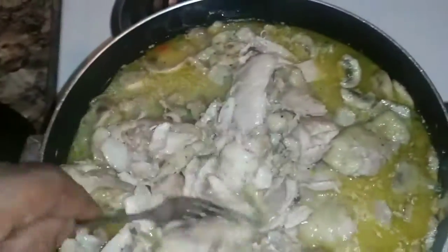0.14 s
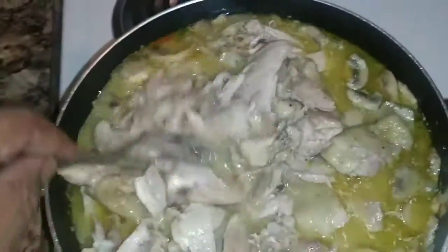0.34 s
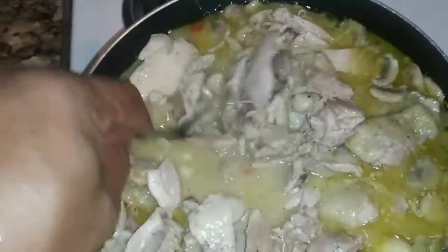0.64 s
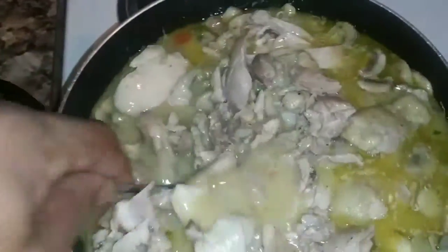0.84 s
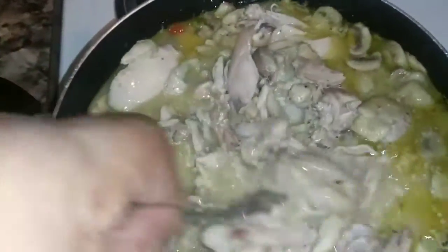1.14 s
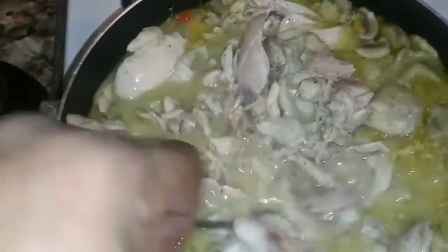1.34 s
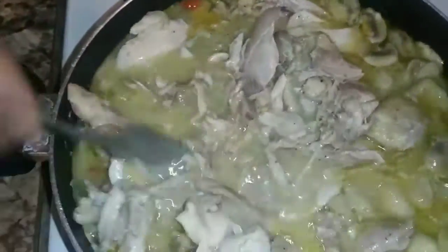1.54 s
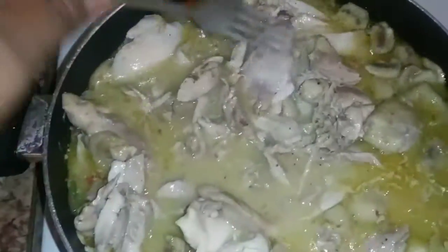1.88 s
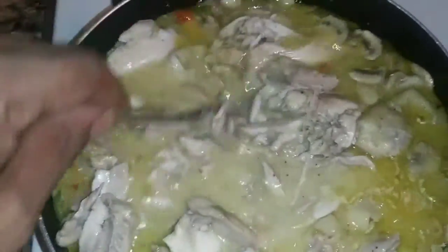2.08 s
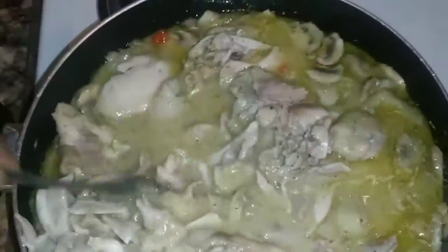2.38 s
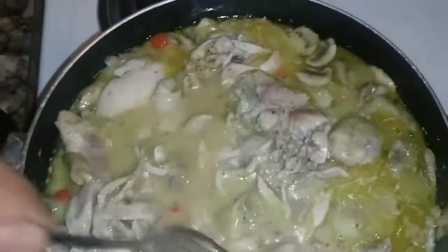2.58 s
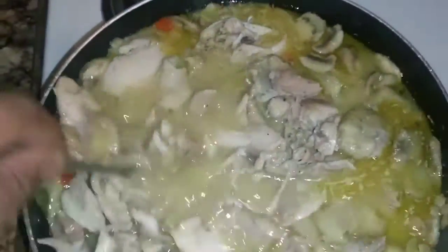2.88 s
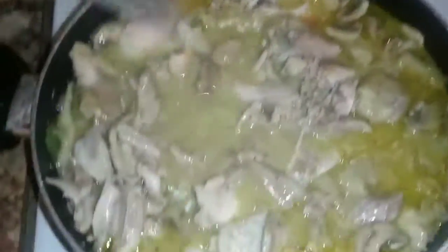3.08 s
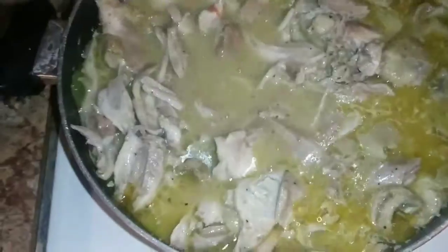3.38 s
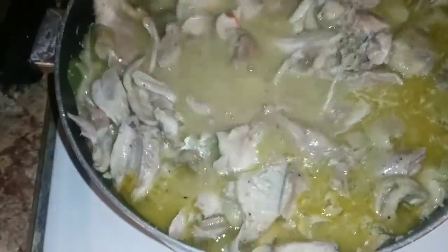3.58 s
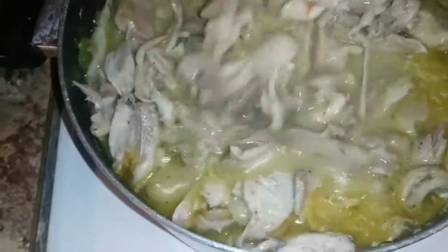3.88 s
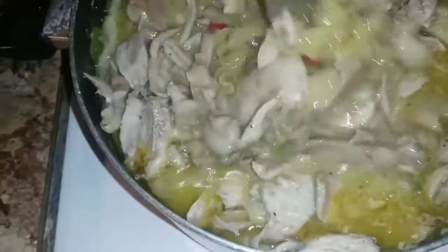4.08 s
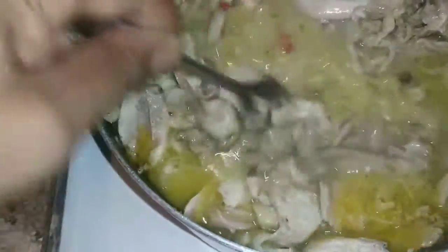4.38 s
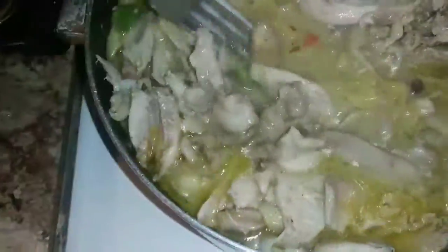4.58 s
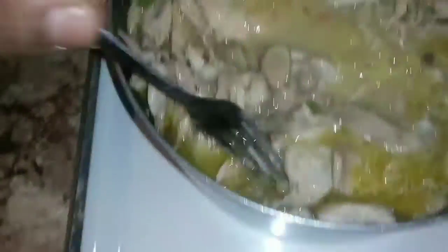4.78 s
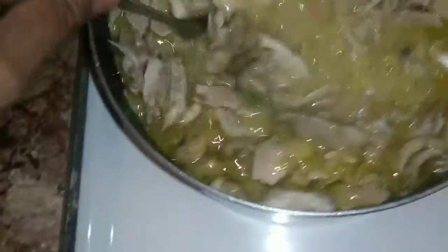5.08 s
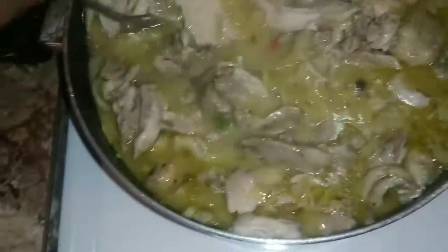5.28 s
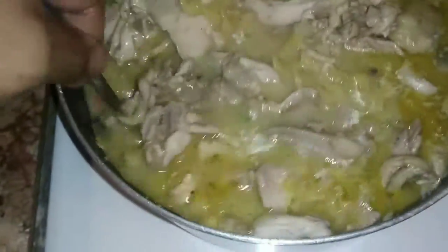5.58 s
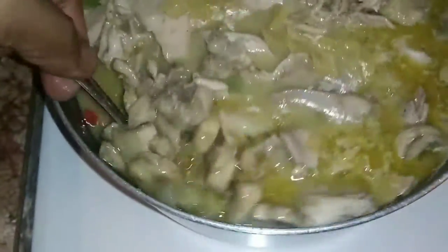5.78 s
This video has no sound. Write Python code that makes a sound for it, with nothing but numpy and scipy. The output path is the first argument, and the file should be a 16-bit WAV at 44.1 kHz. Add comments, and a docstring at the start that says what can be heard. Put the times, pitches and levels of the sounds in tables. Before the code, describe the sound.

A small kitchen, with the microphone close over a pan. Throughout, a soft simmering hiss and random tiny crackling bubbles sit over a faint, wavering low hum and a low rush of air. From 0.2 to 0.7 seconds a fork makes quick wet strokes, with bright squelches, sticky pops and a soft rustle. More strokes come around 1.25 and 1.5, where metal clinks lightly, then at 1.9 and 2.1, with a louder, clear ringing clink near 2.16. A faint scrape comes at 2.7 and a sharp wet pop at 2.94. At 3.3 the fork strikes the pan hard, skids with a brief metallic squeal until about 3.4, and knocks again with a dull bump at 3.44. Vigorous wet stirring follows from 4.0 to 4.55, with small ticks. After a short stroke and light knock near 5.06, it grows quieter, ending with rapid faint metallic ticks from 5.5 and a soft hollow knock at 5.7.

```python
"""In a small, humming kitchen, a fork stirs chicken pieces in a pan of simmering broth, close by. Wet pieces
part with sharp pops and torn films, each a damped ring with early echoes off the pan. The fork clinks and
scrapes: noise bursts and ringing modes, with one hard strike, skid and knock. Light metal ticks sound from
further off in the room. Random tiny bubbles crackle throughout over shaped-noise hiss, wavering hum tones and a
low rush of air."""
import sys
import numpy as np
from scipy import signal
from scipy.fft import rfft, irfft
from scipy.io import wavfile

SR = 44100
rng = np.random.default_rng(int(sys.argv[2]) if len(sys.argv) > 2 else 0)


def store_pcm(level_fs):
    """Save levels as 16-bit WAV."""
    pcm = np.round(np.clip(level_fs, -1, 1) * 32767).astype(np.int16)
    wavfile.write(sys.argv[1], SR, np.atleast_2d(pcm).T)


N = 261749
TIME = np.arange(N) / SR
TAIL = np.arange(SR // 2) / SR  # half a second for anything that rings out

# strokes of the fork through the food:
# start_s, length_s, effort_db (relative), typical_pop_hz
FORK_STROKES = [(0.219, .1, 1, 5900), (0.426, 0.12, -0.5, 5740), (0.602, 0.098, 2.5, 5860),
                (1.253, 0.06, -3, 7000), (1.499, 0.19, -5.5, 9200), (1.9, 0.079, -1, 7740),
                (2.109, 0.1, 0.5, 8700), (2.82, .06, -4, 10600), (4.017, 0.033, 6.5, 6160),
                (4.17, 0.19, -1.5, 8200), (4.444, 0.1, 4.5, 5700), (5.079, .05, 0, 7750)]
# ringing modes of the pan: pitch_hz, level_db (relative), t60_s
PAN_MODES = [(1144.5, 4, 0.23), (2432, -4.5, 0.23), (2562, 1, 0.14), (2620, -27, .3), (2716, -4, 0.23),
             (2720, -25, 0.39), (3760, -8.5, 0.28), (4120, -3, .22), (4800, 3.5, 0.17), (7040, -5, 0.15),
             (7900, 0, 0.16), (8170, 4, 0.15)]


def amp(db):
    """Decibels to gain."""
    return 10 ** (np.asarray(db) / 20)


def evened(x):
    """Scales to rms 1."""
    return x / np.sqrt(np.mean(x ** 2) + 1e-20)


def per_ms(x):
    """Scales a transient to the energy of one millisecond at rms 1."""
    return x * np.sqrt(SR / 1000 / (np.sum(x ** 2) + 1e-20))


def read(points, hz):
    """Reads a table on a log-frequency axis."""
    f, value = np.transpose(points)
    return np.interp(np.log(hz + 1), np.log(f + 1), value)


def add(mix, s, sound):
    """Mixes a sound in at time s, in seconds."""
    part = mix[max(round(s * SR), 0):][:len(sound)]
    part += sound[:len(part)]


def colour(x, spectrum, size=4096):
    """Causal (minimum-phase) filter with the given spectrum."""
    hz = abs(np.fft.fftfreq(size, 1 / SR))
    log_gain = np.log(amp(read(spectrum, hz)))
    taps = np.fft.ifft(np.exp(np.conj(signal.hilbert(log_gain)))).real[:size // 2]
    return signal.oaconvolve(x, taps)[:len(x)]


def drift(hz):
    """Random movement of rms 1, mostly slower than the given rate."""
    lowpass = 1 / (1 + (np.fft.rfftfreq(N, 1 / SR) / hz) ** 4)
    return evened(irfft(rfft(rng.standard_normal(N)) * lowpass, N))


def burst(t60):
    """A dying puff of noise: many close modes struck at once."""
    return rng.standard_normal(len(TAIL)) * 10 ** (-3 * TAIL / t60)


def ring(modes):
    """Free ringing of a set of modes, each a decaying sine with a random phase."""
    out = np.zeros(len(TAIL))
    for hz, db, t60 in modes:
        decay = 1e-3 ** (TAIL / t60)
        out += amp(db) * decay * np.sin(2 * np.pi * (hz * TAIL + rng.random()))
    return out


def pop(hz, width, wall_db=-7, wall_fall_db=3, rise=0.017, size=900, count=4):
    """A liquid film parts and its pocket rings, rising a little; the pan's walls echo it at once."""
    t = TAIL[:size]
    age = np.pi * width * t  # a wider resonance dies sooner
    envelope = age ** 1.2 * np.exp(-age)
    bend = 1 + rise * (np.tanh(age / 4) - .5)
    direct = envelope * np.sin(2 * np.pi * hz * t * bend)
    out = direct.copy()
    for k, (delay, sign) in enumerate(rng.random((count, 2))):
        echo = np.sign(sign - .5) * amp(wall_db - wall_fall_db * k) * direct
        add(out, .0003 + .0011 * (k + delay), echo)
    return per_ms(out)


def stroke(start, length):
    """The fork digs in, pushes for a while, and the food settles."""
    attack_s, release_s = 0.0083, 0.042  # release_s is the time constant
    age = TIME - start
    return np.clip(age / attack_s, 0, 1) * np.exp(-np.maximum(age - length, 0) / release_s)


def fork_push():
    """Effort of all the fork's strokes as one gain curve."""
    return sum(amp(db) * stroke(start, length) for start, length, db, _ in FORK_STROKES)


def broth(snap_db=-11, squelch_db=-34, squelch_s=.007, count=8):
    """The larger pops of wet food, each with a broad snap and a clump of small films tearing around it."""
    # the loudest wet pops and bubbles: time_s, level_db (over 1 ms), ring_hz, width_hz
    wet_pops = [(0.022, -36.5, 10700, 1800), (0.0625, -28, 9100, 1530), (0.065, -41.5, 2420, 600),
                (0.0997, -33.5, 6800, 3800), (0.1984, -42, 4300, 600), (0.2409, -33, 8050, 2700),
                (0.2994, -34, 4180, 1600), (0.4513, -44, 3100, 1210), (0.484, -30, 10200, 5200),
                (0.4999, -33.5, 8040, 1010), (0.5283, -36, 6000, 1400), (0.684, -41.5, 1340, 300),
                (0.6952, -41, 7900, 5000), (0.8115, -37.5, 10000, 1200), (1.011, -49, 4600, 900),
                (1.1075, -36.5, 9060, 1820), (1.1284, -42.5, 3820, 1100), (1.2803, -40, 7900, 1000),
                (1.5036, -32, 7400, 1110), (1.5639, -32.5, 9800, 3800), (1.5974, -32.5, 10200, 2100),
                (1.9005, -42, 2740, 500), (1.9927, -40.5, 4130, 1400), (2.1456, -35, 8200, 800),
                (2.3551, -42, 9400, 2100), (2.5661, -48, 5100, 900), (2.807, -41.5, 5430, 2000),
                (2.8811, -36, 8400, 3100), (2.9396, -30.5, 5700, 3300), (2.9434, -22.5, 10200, 4930),
                (2.946, -32, 2080, 900), (3.022, -40.5, 5430, 1490), (3.47, -26, 7850, 1200),
                (3.6591, -33, 9400, 5100), (3.687, -34.5, 1315, 149), (3.7288, -34.5, 4240, 1530),
                (3.7953, -38.5, 5680, 1110), (4.032, -34, 8400, 4200), (4.0954, -40.5, 4440, 690),
                (4.2053, -32, 10000, 2300), (4.3291, -33.5, 4900, 710), (4.346, -29, 8400, 3260),
                (4.4171, -36.5, 2730, 1170), (4.428, -38.5, 1370, 350), (4.807, -45, 5900, 1900),
                (5.0266, -38.5, 7850, 1000)]
    out = np.zeros(N)
    for s, db, hz, width in wet_pops:
        snap = per_ms(pop(hz, hz * 0.84, count=1) + 0.54 * pop(hz / 2, hz * 0.58, count=1))
        add(out, s, amp(db) * (pop(hz, width) + amp(snap_db) * snap))
        for when, pitch, loud in rng.standard_normal((count, 3)):
            film_hz = np.clip(hz * 2 ** (.45 * pitch - .2), 900, 13000)
            film_db = squelch_db + 2 * loud + 0.58 * db  # bigger pops tear more
            add(out, s + squelch_s * (when + .5), amp(film_db) * pop(film_hz, 0.66 * film_hz))
    return out


def squelches(per_s=75, level_db=-48, spread_db=3.0, spread_octaves=0.49, relative_width=0.37, count=24):
    """Each stroke tears a loose run of small wet films around its typical pitch, each with a dry snap."""
    snap_db, snap_hz, snap_width = -5, 9000, 5500
    out = np.zeros(N)
    for start, length, effort_db, typical_hz in FORK_STROKES:
        ages = (np.arange(count) + rng.random(count)) / per_s
        for age, (pitch, loud) in zip(ages, rng.standard_normal((count, 2))):
            hz = np.clip(typical_hz * 2 ** (spread_octaves * pitch), 2400, 13000)
            film = pop(hz, relative_width * hz) + amp(snap_db) * pop(snap_hz, snap_width)
            if age < length:
                add(out, start + age, amp(level_db + effort_db + spread_db * loud) * film)
    return out


def smear(level_db=-64, patchy_db=3):
    """Wet pieces rub past each other under every stroke: a soft, uneven rustle of shaped noise."""
    # spectrum of wet food rubbing: pitch_hz, level_db (per Hz, relative)
    rub_spectrum = [(500, -11), (1300, 2), (1800, -3), (2700, 2.5), (5000, -4), (8000, 0.5), (14000, -11)]
    rub = rng.standard_normal(N) * amp(patchy_db * drift(180))
    return amp(level_db) * fork_push() * evened(colour(rub, rub_spectrum))


def crackle(per_s=150, level_db=-60, spread_db=3.5, rest_db=-8, count=40):
    """Tiny bubbles burst at random, more and louder while the food is turned."""
    stir = amp(rest_db) + fork_push()  # the food never falls quite still
    out = np.zeros(N)
    for hz in np.geomspace(2200, 14000, count):
        chance, size = rng.random(N), rng.exponential(1, N)
        # per_s is the rate for unit stir and 6 kHz bubbles
        at = np.flatnonzero(chance < per_s * np.sqrt(stir * hz / 6000) / count / SR)
        train = np.zeros(N)
        train[at] = stir[at] * amp(spread_db * np.minimum(size[at], 3.5))
        out += signal.oaconvolve(train, pop(hz, hz * rng.uniform(0.046, 0.33)))[:N]
    return amp(level_db) * out


def spatter(per_s=22, smallest_db=-60, spread_db=4, hz=13000, width=6000):
    """The smallest bubbles burst as thin, high snaps, whether the fork moves or not."""
    size = amp(spread_db * np.minimum(rng.exponential(1, N), 2.5))
    bursts = size * (rng.random(N) < per_s / SR)
    return amp(smallest_db) * signal.oaconvolve(bursts, pop(hz, width))[:N]


def clinks(reach=0.52, clatter_t60=0.1):
    """A short blow sets off a dense clatter and rings the tines, favouring modes near its own pitch."""
    # blows that set the tines ringing:
    # time_s, level_db (over 1 ms), centre_hz, width_hz, ring_db (relative), clatter_db (over 1 ms)
    tine_blows = [(1.5105, -20.5, 4260, 804, -65, -37), (1.5121, -21.5, 4570, 445, -48, -32),
                  (2.1629, -14.5, 4110, 1100, -36, -25.5), (2.1632, -24, 7660, 1600, -57, -24.5),
                  (2.175, -28, 3030, 980, -57, -39)]
    # modes of the fork: pitch_hz, level_db (relative), t60_s
    tine_modes = [(2504, -1.5, 0.2), (3030, -1, 0.14), (4134, -4, 0.19), (4280, -12, 0.33),
                  (4646, -9, 0.14), (5150, -1.5, 0.21), (6780, -1, 0.18), (7250, -4, .1), (8050, -3, 0.13)]
    out = np.zeros(N)
    for s, db, hz, width, ring_db, clatter_db in tine_blows:
        add(out, s, amp(db) * pop(hz, width, count=2))
        clatter = signal.oaconvolve(burst(clatter_t60), pop(hz, 2.0 * width, count=0))
        add(out, s, amp(clatter_db) * per_ms(clatter))
        # each mode loses 6 dB per reach, in octaves, away from the blow's centre
        struck = [(f, d - 6 * abs(np.log2(f / hz)) / reach, t60) for f, d, t60 in tine_modes]
        add(out, s, amp(ring_db) * ring(struck))
    return out


def knocks(contact_t60=0.096, body_t60=0.18, crack_t60=0.017, ring_db=-10, lift_db=5, thud_db=-3):
    """Each blow is a crack, a short clatter, the ring of the pan's wall and the thud of its loaded base."""
    # the fork meets the pan: time_s, crisp_contact_db (relative), hollow_body_db (relative),
    # sharp_crack_db (over 1 ms)
    pan_blows = [(2.749, -47, -40, -52), (3.3063, -21, -29, -10), (3.3201, -24, -50, -19),
                 (3.4394, -37, -25.5, -56), (3.448, -52, -31, -19), (3.4702, -34.5, -28.5, -27),
                 (3.5105, -38, -44, -50), (5.056, -34.5, -35.5, -60), (5.697, -32, -27.5, -37),
                 (5.7242, -55, -37.5, -48), (2.213, -62, -41, -37), (4.501, -61, -46, -41)]
    # spectra of crisp contact and hollow pan body: pitch_hz, level_db (per Hz, relative)
    contact_spectrum = [(100, -57), (300, -18), (900, -2), (1400, -11.5), (2600, 1.5), (3700, -2.5),
                        (4700, 0.5), (6500, -3.5), (8200, -2.5), (10000, -5), (14000, -13.5), (16000, -30)]
    body_spectrum = [(40, -62), (150, -5), (450, 4), (560, -1), (780, 5), (950, -4), (1350, -2),
                     (1800, -4.5), (2400, 1), (3000, -15.5), (8000, -5), (15000, -27)]
    # modes of the pan's base, damped by the food: pitch_hz, level_db (relative), t60_s
    base_modes = [(462, -3.5, 0.11), (698, 4.5, 0.11), (806, 3, 0.058), (1225, 0.5, 0.088),
                  (1594, -2.5, .1), (2380, -14, 0.32)]
    out, pan, base = np.zeros(N), per_ms(ring(PAN_MODES)), per_ms(ring(base_modes))
    for s, crisp, hollow, crack in pan_blows:
        add(out, s, amp(crack) * per_ms(colour(burst(crack_t60), contact_spectrum)))
        clatter = per_ms(colour(burst(contact_t60), contact_spectrum))
        add(out, s, amp(crisp + lift_db) * (clatter + amp(ring_db) * pan))
        body = per_ms(colour(burst(body_t60), body_spectrum))
        add(out, s, amp(hollow) * (amp(lift_db) * body + amp(thud_db) * base))
    return out


def ticks(t60=0.096, tail_t60=0.39, tail_db=-10, lift_db=10):
    """Light ticks of one metal part: the same bright ring each time, a little varied."""
    # light, bright ticks of metal: time_s, level_db (relative)
    metal_ticks = [(2.751, -43), (3.604, -40.5), (4.149, -44.5), (4.205, -42.5), (4.311, -45), (4.699, -40),
                   (4.859, -42), (4.936, -43), (5.486, -44), (5.517, -43), (5.55, -42), (5.591, -43),
                   (5.635, -40), (5.667, -41)]
    # spectrum of a tick: pitch_hz, level_db (per Hz, relative)
    tick_spectrum = [(700, -8), (1500, -14), (3200, -10.5), (4000, -11), (4780, -2), (6100, -12),
                     (7500, 1.5), (9500, -2.5), (13000, -9.5), (14000, -13), (16000, -18)]
    out = np.zeros(N)
    shared = burst(t60) + amp(tail_db) * burst(tail_t60)
    for s, db in metal_ticks:
        varied = shared + 0.87 * burst(t60)
        add(out, s, amp(db + lift_db) * per_ms(colour(varied, tick_spectrum)))
    return out


def slides(slips_per_s=5000, squeal_hz=1065, waver=0.029, judder_db=3, overtone=0.4, ring_db=-11):
    """Tiny uneven slips of metal ring the pan, joined by a wavering squeal with its octave."""
    # the fork slides on the pan, one group of points per slide: time_s, friction_db, squeal_db
    pan_slides = [
        [(2.695, -60, -94), (2.71, -50.5, -77), (2.745, -60, -77), (2.79, -61, -85)],
        [(3.322, -43, -52), (3.345, -32, -54), (3.368, -30.5, -33), (3.385, -36, -56), (3.402, -56, -57)],
        [(3.436, -57, -75), (3.445, -47, -63), (3.475, -70, -68), (3.53, -68, -75)],
    ]
    # spectrum of the slips: pitch_hz, level_db (per Hz, relative)
    friction_spectrum = [(60, -34), (200, -24), (700, -7), (1100, -4), (1350, -9.5), (2000, 0.5),
                         (2300, -4), (2650, 0), (3100, 0), (4000, -10.5), (8000, -11.5), (14000, -23),
                         (16000, -20)]
    friction, squeal = np.zeros((2, N))
    for rows in pan_slides:
        s, friction_db, squeal_db = np.transpose(rows)
        friction += np.interp(TIME, s, amp(friction_db), left=0, right=0)
        squeal += np.interp(TIME, s, amp(squeal_db), left=0, right=0)
    impulses = np.sign(rng.standard_normal(N)) * (rng.random(N) < slips_per_s / SR)
    grip = impulses * amp(judder_db * drift(230))
    slips = friction * evened(colour(grip, friction_spectrum))
    pan = ring(PAN_MODES)
    ringing = signal.oaconvolve(slips, pan / np.linalg.norm(pan))[:N]
    turn = 2 * np.pi * np.cumsum(squeal_hz * (1 + waver * drift(119))) / SR
    squeal_tone = evened(np.sin(turn) + overtone * np.sin(2 * turn))
    return slips + amp(ring_db) * ringing + squeal * squeal_tone


def shoves(t60=0.27):
    """The pan is shoved against the hob, which takes its weight with a dull bump of low noise."""
    # shoves of the pan: time_s, level_db (over 1 ms)
    hob_bumps = [(3.308, -48), (3.442, -38.5)]
    # pitch in Hz, relative level in dB per Hz
    dull = [(25, -16), (60, -7), (120, -2), (250, -9), (600, -30), (2000, -66)]
    out = np.zeros(N)
    for s, db in hob_bumps:
        add(out, s, amp(db) * per_ms(colour(burst(t60), dull)))
    return out


def simmer(per_s=900, level_db=-60, spread_db=4.0, steady_share=0.63, swell_db=1.5):
    """The pan's soft hiss: countless bubbles too small to tell apart, with a fine grain of nearer ones."""
    # spectrum of the hiss: pitch_hz, level_db (per Hz, relative)
    hiss_spectrum = [(600, -10), (1200, 5.5), (1700, -1), (2300, 1.5), (3300, -8.5), (4800, -5),
                     (6400, -12.5), (8200, -1.5), (10000, -7), (13000, -13.5), (16000, -8.5)]
    size = amp(spread_db * np.minimum(rng.exponential(1, N), 3))
    grains = rng.standard_normal(N) * size * (rng.random(N) < per_s / SR)
    steady = np.sqrt(steady_share) * rng.standard_normal(N)
    fizz = steady + np.sqrt(1 - steady_share) * evened(grains)
    return amp(level_db + swell_db * drift(5.7)) * evened(colour(fizz, hiss_spectrum))


def background(rush_db=-52.5, waver_hz=3, throb=0.12):
    """A wavering appliance hum of drifting sines in its low rush of air, made of shaped noise."""
    # tones of the hum: pitch_hz, level_db (rms)
    hum_tones = [(169, -66), (214, -64), (253, -62.5), (296, -67.5), (339, -55.5), (473.5, -70.5),
                 (711, -70.5)]
    # spectrum of the rush: pitch_hz, level_db (per Hz, relative)
    rush_spectrum = [(15, -101), (25, -61), (47, -34), (139, -23), (161, -15), (308, -12), (334, -2),
                     (440, -16.5), (469, -12.5), (500, -20.5), (543, -14), (670, -21.5), (800, -18.5),
                     (941, -22), (1200, -30.5), (1560, -59), (2640, -120)]
    hum = np.zeros(N)
    for hz, db in hum_tones:
        turn = 2 * np.pi * np.cumsum(hz + waver_hz * drift(14.2)) / SR
        hum += amp(db) * evened((1 + throb * drift(14)) * np.sin(turn))
    rush = amp(rush_db) * evened(colour(rng.standard_normal(N), rush_spectrum))
    return hum + rush


def kitchen(x, size=256):
    """Dense reflections from near walls, each band dying at its own speed."""
    # ring time of the kitchen: pitch_hz, t60_s
    ring_time = [(200, 0.6), (1000, 0.6), (3000, 0.48), (8000, 0.28), (15000, 0.52)]
    hz, t, z = signal.stft(rng.standard_normal(len(TAIL)), SR, nperseg=size)
    decay = 1e-3 ** (t / read(ring_time, hz)[:, None])
    tail = signal.istft(z * decay, SR, nperseg=size)[1][:len(TAIL)]
    onset = np.clip((TAIL - .002) / 0.0013, 0, 1)  # reflections begin after 2 ms
    tail *= onset * (1 + 0.83 * np.exp(-TAIL / 0.011))  # denser energy early on
    return signal.oaconvolve(x, tail / np.linalg.norm(tail))[:N]


def scene(food_room_db=-12, metal_room_db=-7):
    """Food and fork near the microphone, with the room behind."""
    # the clinks share the food's weaker send to the room
    food = broth() + squelches() + smear() + crackle() + spatter() + clinks()
    metal = knocks() + ticks() + slides() + shoves()
    room = kitchen(amp(food_room_db) * food + amp(metal_room_db) * metal)
    return (food + metal + room + simmer() + background())[None]


def record(dry, edge_hz=15800):
    """The small microphone drops the deep bass; then the recorder's band limit takes the top."""
    thin = signal.sosfilt(signal.butter(2, 45, "highpass", fs=SR, output="sos"), dry)
    band_limit = signal.firwin(301, edge_hz, window=("kaiser", 8), fs=SR)
    return signal.oaconvolve(thin, band_limit[None], "same")


dry = scene()
out = record(dry)
store_pcm(out)
```